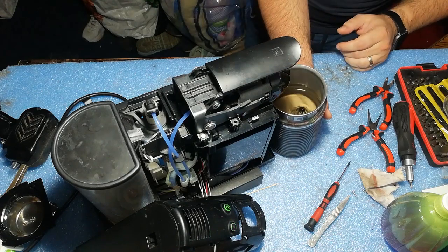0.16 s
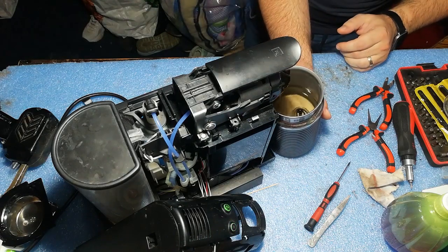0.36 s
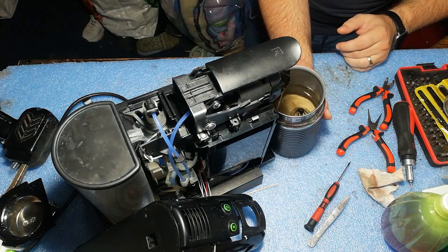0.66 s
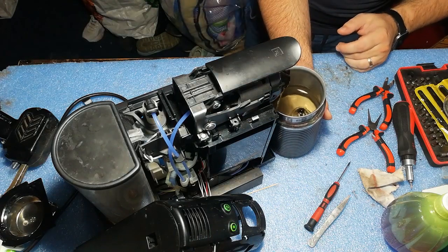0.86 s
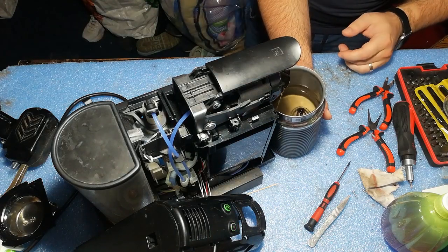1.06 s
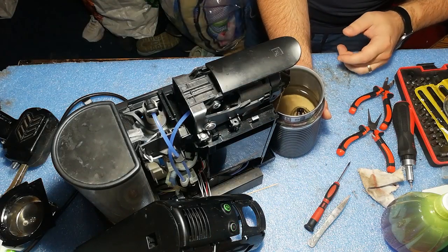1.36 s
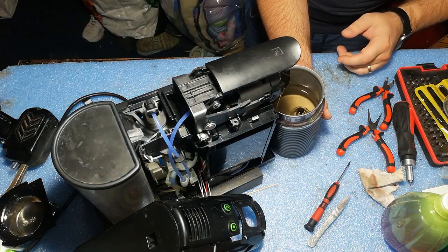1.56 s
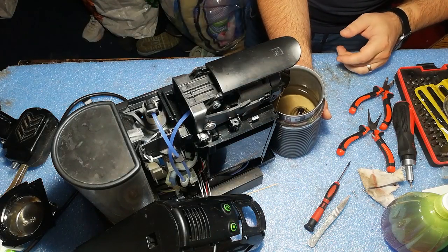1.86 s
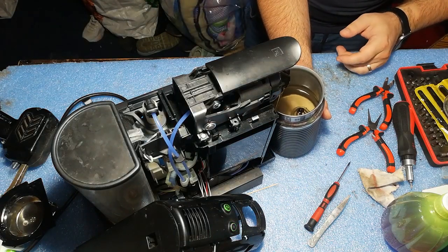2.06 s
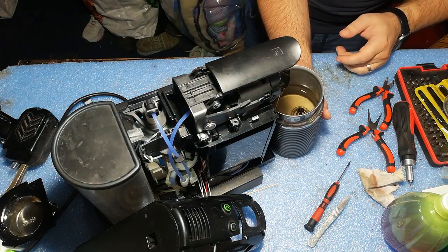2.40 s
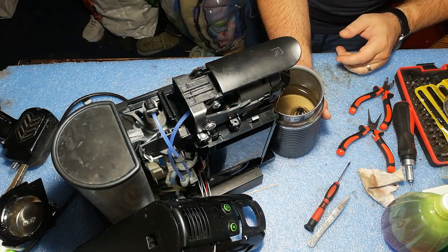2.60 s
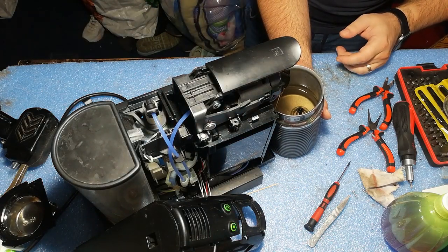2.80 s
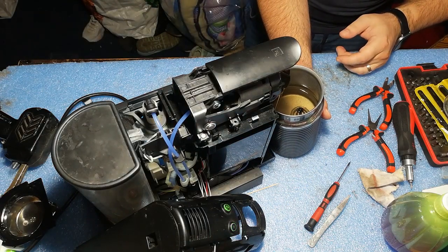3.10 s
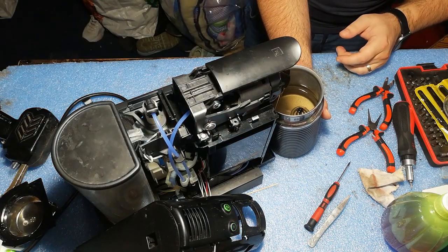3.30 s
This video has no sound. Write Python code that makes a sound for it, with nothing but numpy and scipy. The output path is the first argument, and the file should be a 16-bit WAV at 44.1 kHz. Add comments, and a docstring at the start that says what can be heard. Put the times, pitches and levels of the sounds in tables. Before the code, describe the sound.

A coffee machine pump buzzes and rattles steadily over a hiss of flowing water.

```python
"""A hard, rattling buzz: the vibration pump of an opened coffee machine on a workbench, fifty strokes
a second. Each stroke is a sharp slap of the piston, a spurt of water and a chatter of the valve, all
ringing in the housing, over the hum and knocking of the casing and the hiss of the flow.
The sound firms up as pressure builds; one drop plops into the cup."""
import sys
import numpy as np
from scipy import signal
from scipy.fft import rfft, irfft
from scipy.io import wavfile

SR = 44100
rng = np.random.default_rng(int(sys.argv[2]) if len(sys.argv) > 2 else 0)


def unload_audio(sound):
    """Save the sound as a 16-bit wav file, at the path given as the first command line argument."""
    columns = np.transpose(np.atleast_2d(sound))
    # keep every value between -1 and 1, then stretch to whole-number steps
    steps = np.round(np.clip(columns, -1, 1) * 32767)
    wavfile.write(sys.argv[1], SR, steps.astype(np.int16))


N = 152145
T = np.arange(N) / SR
PUMP_HZ, FIRST_STROKE_S, JITTER_MS = 49.983, .0138, 0.087

# build-up of the water pressure (t/s, share of full pressure/0-1)
WATER_PRESSURE = [(0, 0), (.75, 0.02), (1.15, 0.43), (1.5, 0.76), (2.2, 0.99), (3.45, 0.82)]
# fader rides on piston and valve (t/s, slap level/dB, valve level/dB)
STROKE_FADERS = [(0.02, -31.5, -34.5), (0.68, -32, -33.5), (0.92, -35, -32), (1.1, -32, -34),
                 (1.16, -33, -27.5), (1.4, -30.5, -33.5), (1.46, -31.5, -28.5), (2.0, -30.0, -30.5),
                 (2.06, -32, -29.5), (2.12, -26.5, -32), (2.18, -33.5, -29.5), (2.6, -28.5, -28.9),
                 (2.66, -31, -31.5), (2.72, -25.5, -31), (2.78, -32.5, -31), (2.84, -26.5, -31),
                 (2.96, -28, -31), (3.38, -28, -31.5)]
# noise bursts within each stroke, one pattern per layer
# (delay/ms, rise/ms, decay/ms, level/dB, gain at full pressure/dB, level scatter/dB)
SLAP_BURSTS = [(0.33, 0.59, 0.48, 1.5, -0.9, 0), (2, 0.29, 3.1, -5.5, -1, 2), (5, .7, 3.55, -15.5, 3.5, 2)]
VALVE_BURSTS = [(0.1, .36, .65, -0.5, -2, 0.77), (3, 0.3, 1, 0, -3, 1.1), (6, 0.5, 0.61, -3.5, 4.4, 1.8),
                (8.5, .45, 2.16, -12, -0.5, 2.3)]
SPURT_BURSTS = [(-0.1, 0.92, 0.75, -3.5, 0.1, 3.6), (2, 1, 6.9, -5.5, 0.57, 0.78),
                (6, 0.46, 2.3, -10, 2.6, 1.1)]
KNOCK_BURSTS = [(12.55, 0.74, 2.3, -5.5, 5, 0.48), (16.4, 0.79, 2.2, -0.5, -1, .9),
                (5.9, 1.3, 1.4, -3, -8.5, 0.82)]
TAP_BURSTS = [(.8, .55, 0.6, -1, -2.2, 1.2), (3.4, 1.8, 13, -6, 0.78, 0.71)]
# EQ curve of each layer (f/Hz, level/dB)
SLAP_EQ = [(1000, -46), (4000, -18), (5550, -8.5), (6150, -1), (7200, -2.5), (8500, 0.1), (10000, -4.5),
           (11500, -14), (16000, -23)]
VALVE_EQ = [(3000, -50), (7500, -18), (9000, -5.5), (9700, 0), (10300, -1.5), (10900, -5.5), (12200, -12.5),
            (16000, -31)]
SPURT_EQ = [(800, -40), (2400, -8.5), (2950, -4.5), (4050, -0.5), (5300, -1), (11000, -0.2), (13500, 1.7),
            (16000, -5)]
KNOCK_EQ = [(120, -22.5), (290, -22), (335, -12), (385, -21.5), (465, -3), (520, -22), (620, -24.5),
            (750, -2.5), (830, 1), (950, 0.5), (1060, -4), (1200, -17), (2500, -35.5)]
TAP_EQ = [(500, -28.5), (1150, -8), (1380, -1), (1550, -5.5), (1790, 0), (1980, -4), (2180, 2.5),
          (2500, -3), (4000, -23)]
HISS_EQ = [(25, -5), (110, -4.5), (300, -4.5), (600, -7.5), (900, 0.7), (2000, -1), (2800, -0.5),
           (5000, -5), (7000, 0), (10000, 5), (12000, -13), (16000, -8)]
# resonances and notches of the housing (f/Hz, width/Hz, left gain/dB, right gain/dB)
HOUSING_RESONANCES = [(764, 21, 1, 3.5), (922, 21, 8, 3), (1285, 100, 5.5, -6), (1950, 71, -4, -4.5),
                      (2300, 53, -5, -10.5), (2873, 240, 8, 6), (3270, 230, 6, 5.5), (3430, 55, -18, -5),
                      (3660, 280, 6, 9.5), (4010, 96, 7.5, 8), (4010, 100, -10, -1.5),
                      (4370, 190, 6.5, 9.5), (4930, 160, 3.3, 5.5), (6233, 190, 6.5, -3.7),
                      (6720, 260, 6.5, 6), (7580, 74, 1, 1), (8030, 56, 7, 1), (8580, 170, 5.5, 2.2),
                      (9460, 110, 7.5, -10.5), (9750, 79, 4.5, -7.5), (10200, 140, 8.5, 8)]
# casing hum (multiple of the stroke rate, level/dB, left minus right/dB, gain at full pressure/dB)
HUM_HARMONICS = [(1, -48.1, 0, 2), (2, -56.6, 0, -3), (3, -53.5, 0, -3), (4, -66.8, 3, 3),
                 (5, -49.1, -1, 0), (6, -61.2, 4, -1), (7, -70.6, -2, 7), (8, -64.7, -2, 5),
                 (9, -60.0, 1, 8), (10, -64.6, -18, 6), (11, -66.5, 4, 0), (12, -67.8, -7, 2),
                 (13, -74.6, 0, 12), (14, -59.7, 6, 0), (15, -49.6, -6, 1), (16, -58.5, -15, 8),
                 (17, -62.0, -8, 10), (18, -58.2, 7, -1), (19, -56.9, -4, 3), (20, -60.9, -2, 0),
                 (21, -61.1, -2, 6), (22, -66.1, 0, 4), (23, -70.8, 2, 7), (26, -65.8, 1, -2),
                 (27, -66.4, -2, 2), (28, -59.9, -1, -9), (29, -64.8, -4, 1), (31, -72.7, -3, 8),
                 (34, -67.0, 0, 3), (36, -67.8, -5, 5), (37, -71.2, -7, 9)]
# the drop and its rebound (t/s, level/dB)
DROP_HITS = [(1.6865, -25), (1.7046, -35)]
# ring of the bubble the drop makes in the water (f/Hz, level/dB, t60/s)
BUBBLE_MODES = [(1010, -.5, 0.038), (1288, 0.58, 0.051)]


def amp(db):
    """Decibels to gain."""
    return 10 ** (np.asarray(db) / 20)


def unit(x):
    """Scales to rms 1."""
    return x / np.sqrt(np.mean(x ** 2) + 1e-20)


def pan(db):
    """Stereo gains for a left-minus-right level."""
    return amp([[db / 2], [-db / 2]])


def curve(rows, t, column=1):
    """Reads one column of a table as an automation curve."""
    rows = np.array(rows)
    return np.interp(t, rows[:, 0], rows[:, column])


def drift(rate_hz, size=1024):
    """Slow random modulation of rms 1, up to about the given rate."""
    hz = np.fft.rfftfreq(size, N / SR / size)
    slow = unit(irfft(rfft(rng.standard_normal(size)) / (1 + (hz / rate_hz) ** 2)))
    return np.interp(T, np.linspace(0, N / SR, size), slow)


def stereo_noise(shared, left_lead_ms=0.13):
    """White noise whose shared part reaches the left side first."""
    common, left, right = rng.standard_normal((3, N))
    hz = np.fft.rfftfreq(N, 1 / SR)
    late = irfft(rfft(common) * np.exp(-2j * np.pi * hz * left_lead_ms / 1000), N)
    return np.sqrt(shared) * np.array([common, late]) + np.sqrt(1 - shared) * np.array([left, right])


def housing(x, eq, size=4096):
    """A broad EQ with the ring of the housing on top, different on each side."""
    hz = abs(np.fft.fftfreq(size, 1 / SR))
    eq_hz, eq_db = np.transpose(eq)
    db = np.interp(np.log(hz + 1), np.log(eq_hz), eq_db)
    for centre, width, left, right in HOUSING_RESONANCES:
        db = db + np.array([[left], [right]]) / (1 + (2 * (hz - centre) / width) ** 2)
    minimum_phase = np.exp(signal.hilbert(np.log(amp(db))).conj())  # rings only after the hit
    response = np.fft.ifft(minimum_phase).real
    return signal.fftconvolve(x, response[:, :size // 2], axes=1)[:, :N]


def bursts(strokes, pattern, eq, shared, pan_db):
    """Every stroke fires a pattern of slightly uneven noise bursts into the housing; rms 1."""
    power = np.zeros(N)
    for delay, rise, decay, db, pressure_db, scatter_db in pattern:
        strength, slip = rng.standard_normal((2, len(strokes)))
        starts = strokes + (delay + JITTER_MS * slip) / 1000
        gains = amp(db + pressure_db * curve(WATER_PRESSURE, strokes) + scatter_db * strength)
        for start, gain in zip(starts, gains):
            a, b = np.searchsorted(T, [start - .5 / PUMP_HZ, start + 2 / PUMP_HZ])
            ms = (T[a:b] - start) * 1000
            power[a:b] += (gain * np.exp(np.minimum(ms / rise, -ms / decay))) ** 2
    return unit(housing(np.sqrt(power) * stereo_noise(shared), eq) * pan(pan_db))


def piston_slap(strokes):
    """The piston strikes: a sharp, bright attack on every stroke."""
    fader = amp(0.49 + curve(STROKE_FADERS, T, column=1))
    return fader * bursts(strokes, SLAP_BURSTS, SLAP_EQ, shared=0.61, pan_db=2.5)


def water_spurts(strokes):
    """Each stroke pushes water through in a short, wide-band spit."""
    return amp(-35.5) * bursts(strokes, SPURT_BURSTS, SPURT_EQ, shared=.35, pan_db=0.7)


def valve_chatter(strokes):
    """The valve rattles in four thin, high ticks a stroke."""
    fader = amp(1.4 + curve(STROKE_FADERS, T, column=2))
    return fader * bursts(strokes, VALVE_BURSTS, VALVE_EQ, shared=0.1, pan_db=0.6)


def casing_knocks(strokes):
    """The casing answers each stroke with midrange taps and lower, hollow knocks."""
    taps = amp(-45.5) * bursts(strokes, TAP_BURSTS, TAP_EQ, shared=0.85, pan_db=-2.6)
    knocks = amp(-47.5) * bursts(strokes, KNOCK_BURSTS, KNOCK_EQ, shared=0.85, pan_db=-4)
    return taps + knocks


def casing_hum(delay_ms=14.3, resonance_hz=801, smear_ms_per_khz=11, scatter_rad=0.72, waver=.0085):
    """The shaking pump drives the casing at multiples of the stroke rate; higher ones waver more."""
    out, pressure = np.zeros((2, N)), curve(WATER_PRESSURE, T)
    turns = PUMP_HZ * (T - FIRST_STROKE_S - delay_ms / 1000)
    for k, db, pan_db, pressure_db in HUM_HARMONICS:
        # the casing smears each shake: tones above its main resonance come later, those below earlier
        lag = np.pi * smear_ms_per_khz * ((k * PUMP_HZ - resonance_hz) / 1000) ** 2
        phase = 2 * np.pi * k * turns - lag + scatter_rad * rng.standard_normal()
        phase += waver * k * drift(rate_hz=7.7)
        level = amp(db + pressure_db * pressure) * (1 + waver * k * drift(rate_hz=8.1))
        out += pan(pan_db) * np.sqrt(2) * level * np.cos(phase)
    return out


def flow_hiss(swell_db=4.5):
    """Flowing water lays a bed of hiss between the strokes, swelling with the pressure."""
    level = amp(-38.5 + swell_db * (curve(WATER_PRESSURE, T) - 1))
    return level * unit(housing(stereo_noise(shared=0.1), HISS_EQ))


def drop_plop(attack_s=0.002):
    """A drop lands and rebounds in the cup, and its bubble rings briefly in the water."""
    out = np.zeros(N)
    for start, hit_db in DROP_HITS:
        t = np.maximum(T - start, 0)
        attack = np.minimum(t / attack_s, 1)
        for hz, db, t60 in BUBBLE_MODES:
            out += attack * amp(hit_db + db - 60 * t / t60) * np.sin(2 * np.pi * hz * t)
    return out * pan(db=-1.5)


def room(x, t60_s=0.15, predelay_s=.004, low_cut_hz=500, wet_db=-12.5):
    """A short diffuse tail from the workshop, without bass."""
    t = T[:SR // 2]
    tail = rng.standard_normal((2, len(t))) * amp(-60 * t / t60_s) * (t > predelay_s)
    tail = signal.sosfilt(signal.butter(2, low_cut_hz, "high", fs=SR, output="sos"), tail)
    return amp(wet_db) * signal.fftconvolve(x, tail / np.linalg.norm(tail[0]), axes=1)[:, :N]


def scene():
    """The mix: pump strokes and drop feed the room; hum and hiss stay dry."""
    strokes = FIRST_STROKE_S + np.arange(-1, N / SR * PUMP_HZ) / PUMP_HZ
    strokes += JITTER_MS * rng.standard_normal(len(strokes)) / 1000
    pump = piston_slap(strokes) + water_spurts(strokes) + valve_chatter(strokes) + casing_knocks(strokes)
    bed = casing_hum() + flow_hiss()
    hits = pump + drop_plop()
    return bed + hits + room(hits)


def record(dry, cutoff_hz=15900):
    """A steep high cut takes off the topmost air."""
    high_cut = signal.firwin(511, cutoff_hz, window=("kaiser", 9), fs=SR)
    return signal.oaconvolve(dry, high_cut[None], "same")


dry = scene()
out = record(dry)
unload_audio(out)
```